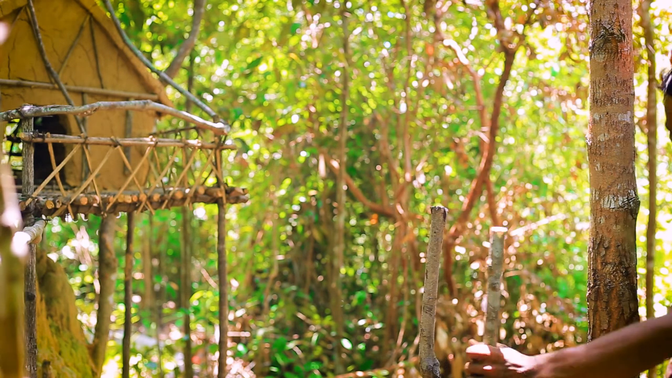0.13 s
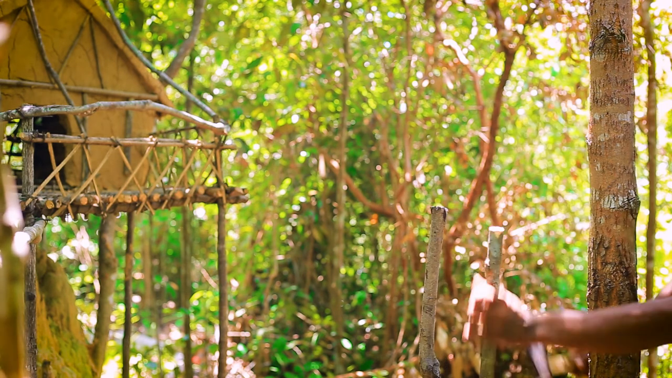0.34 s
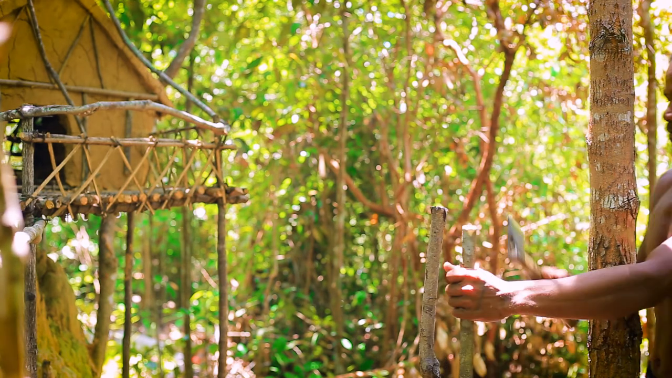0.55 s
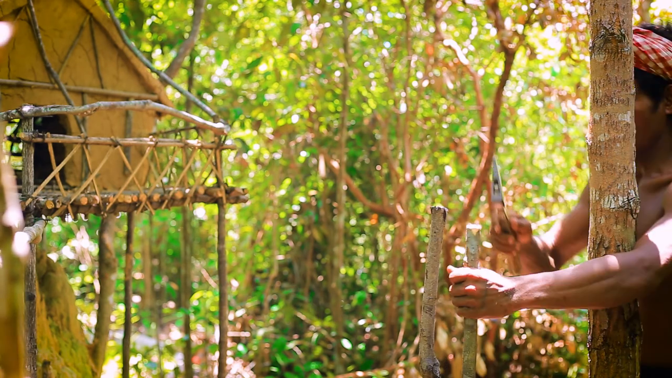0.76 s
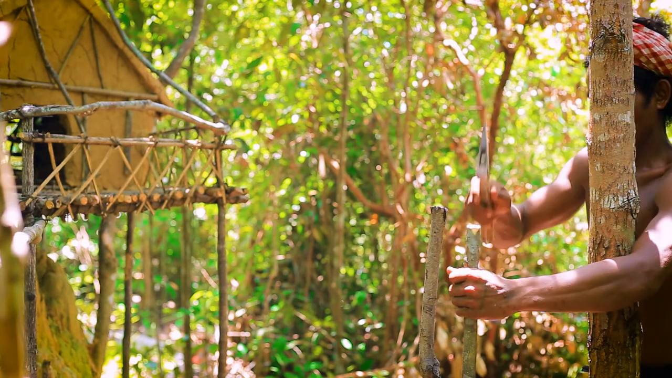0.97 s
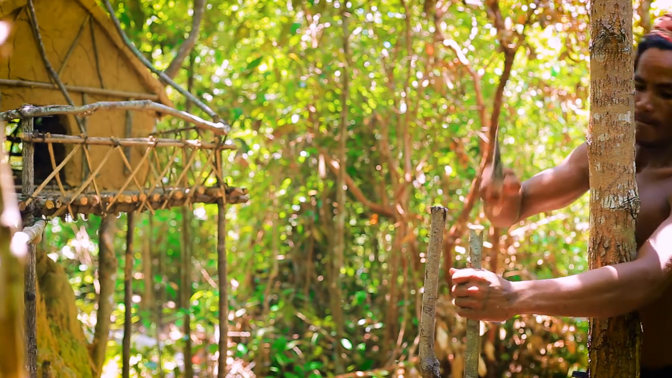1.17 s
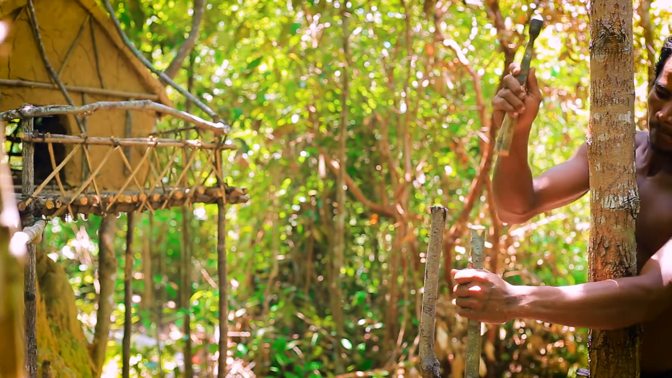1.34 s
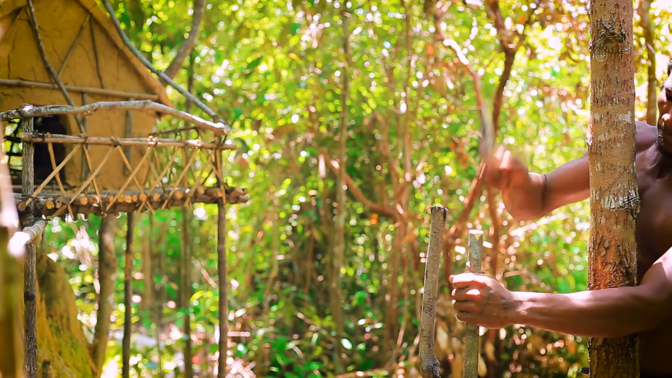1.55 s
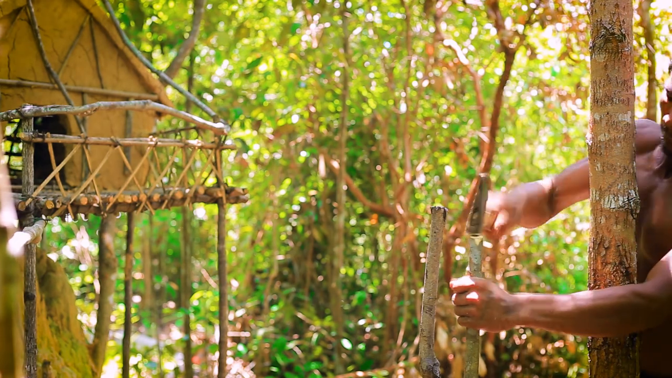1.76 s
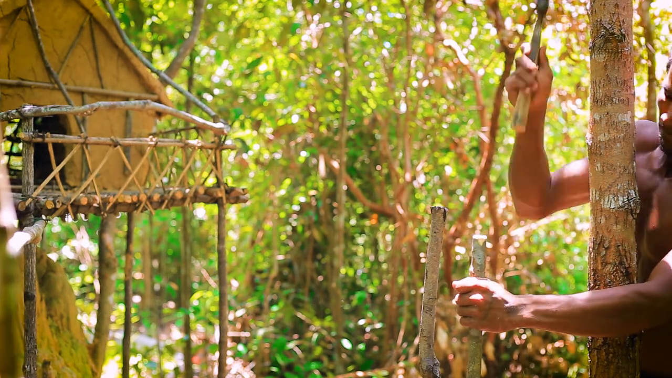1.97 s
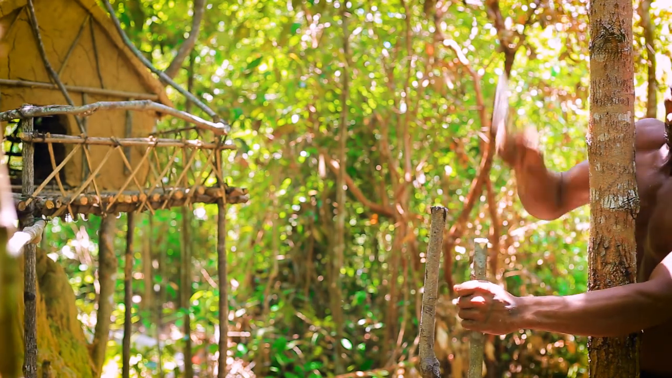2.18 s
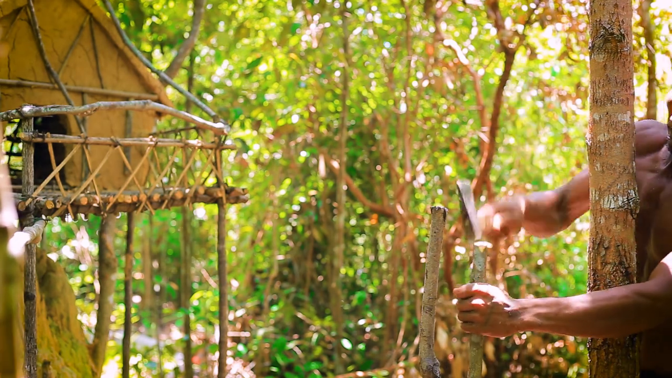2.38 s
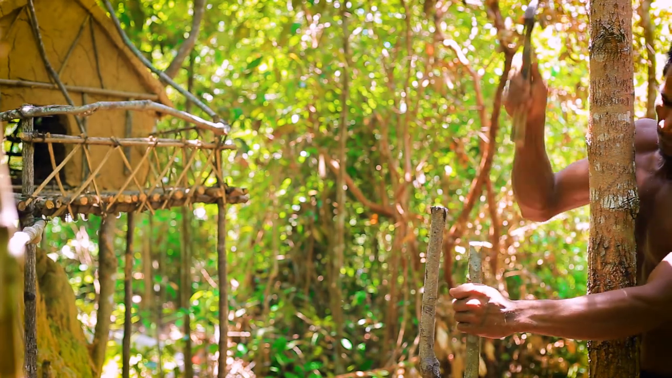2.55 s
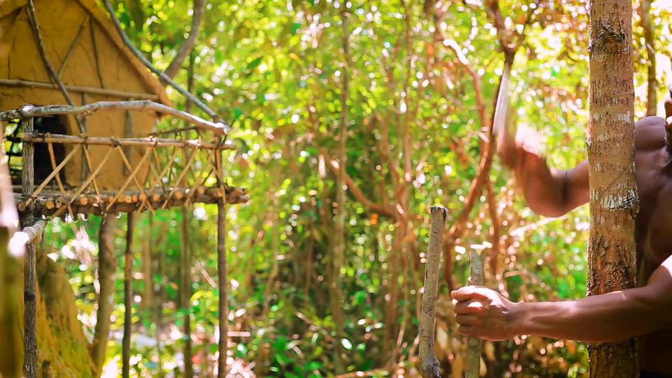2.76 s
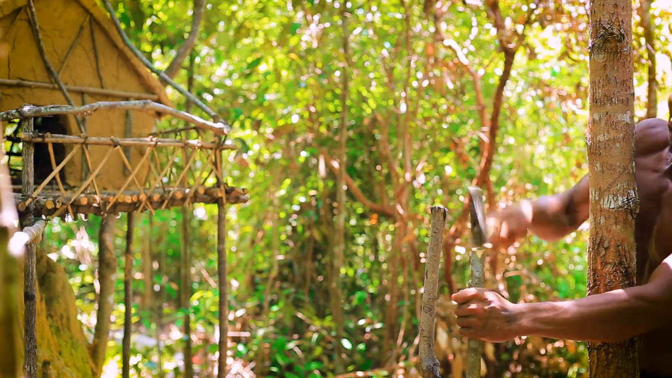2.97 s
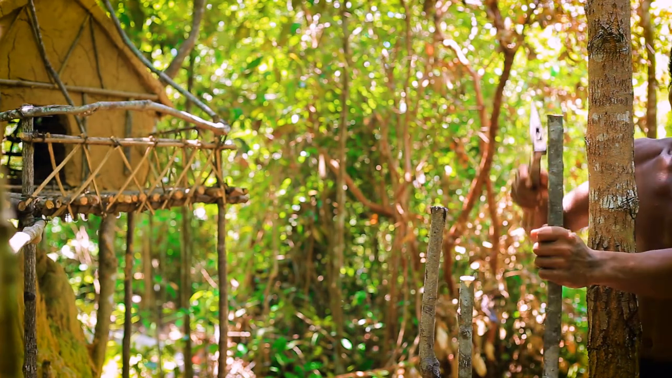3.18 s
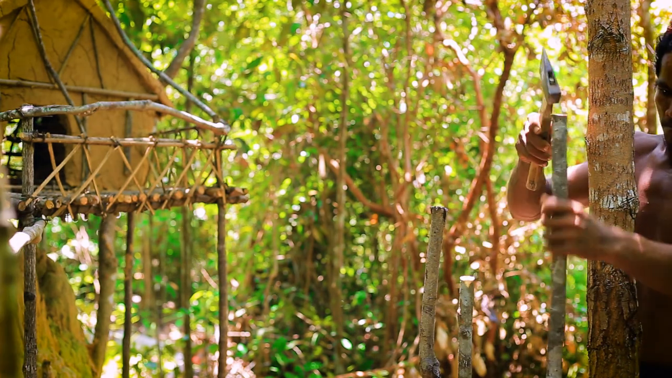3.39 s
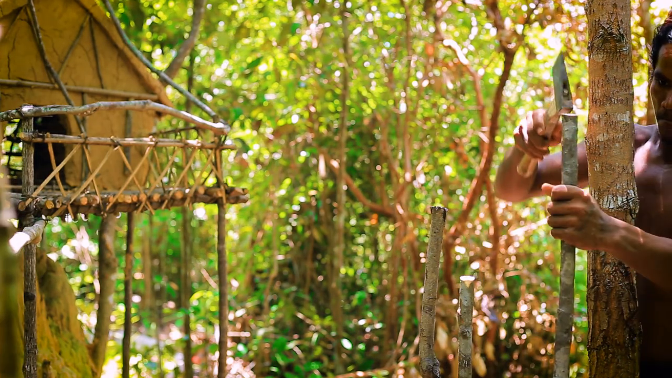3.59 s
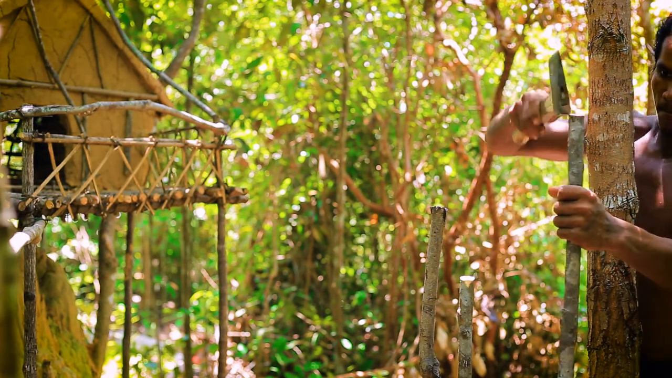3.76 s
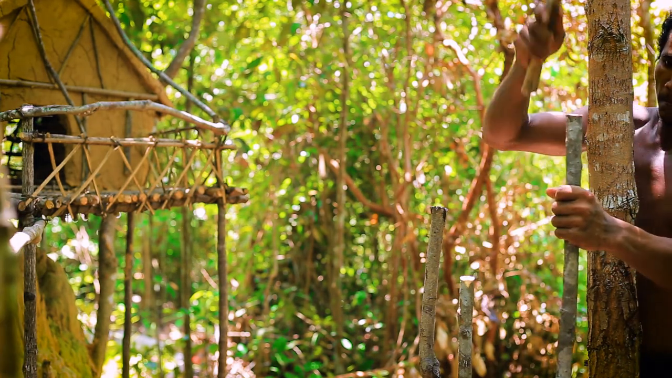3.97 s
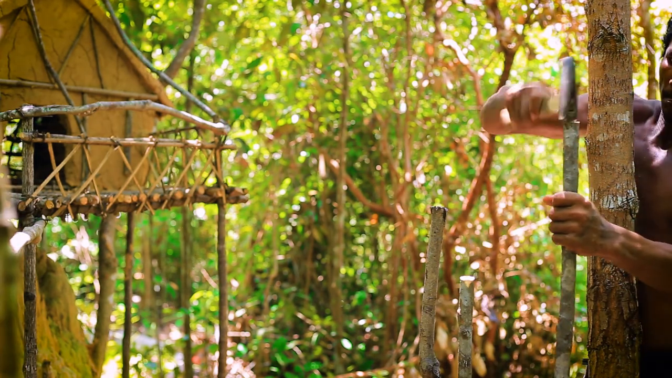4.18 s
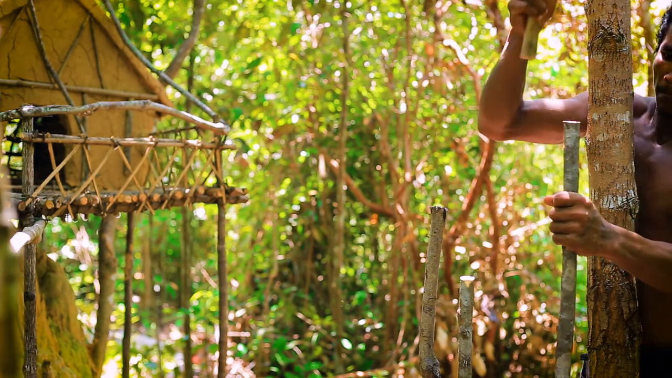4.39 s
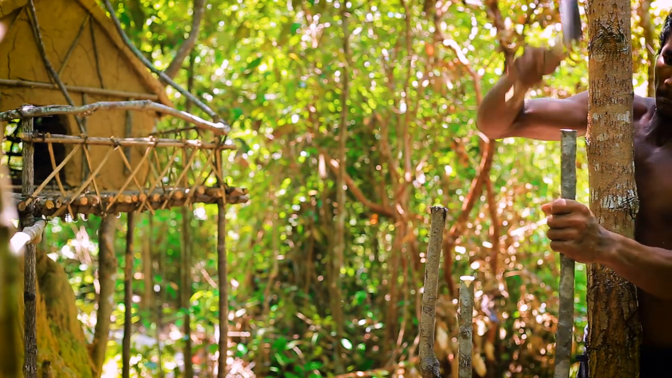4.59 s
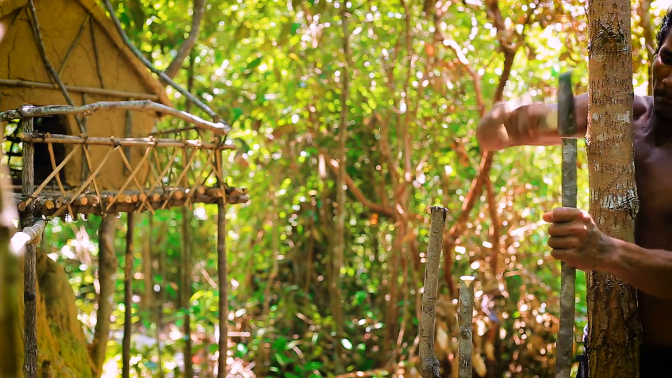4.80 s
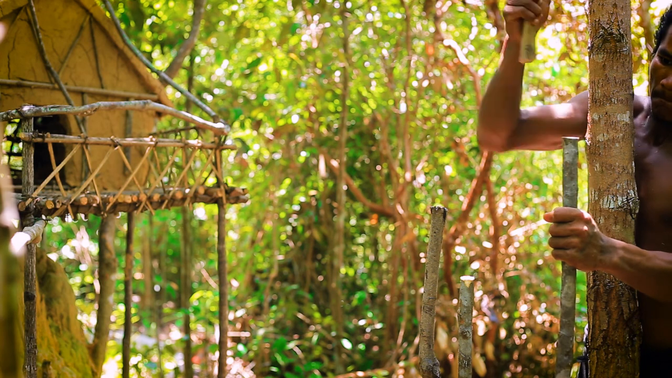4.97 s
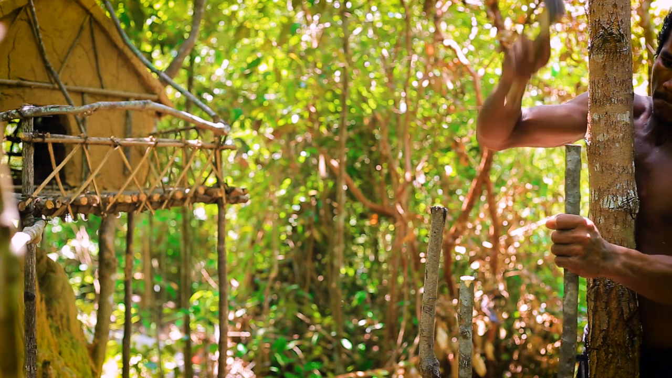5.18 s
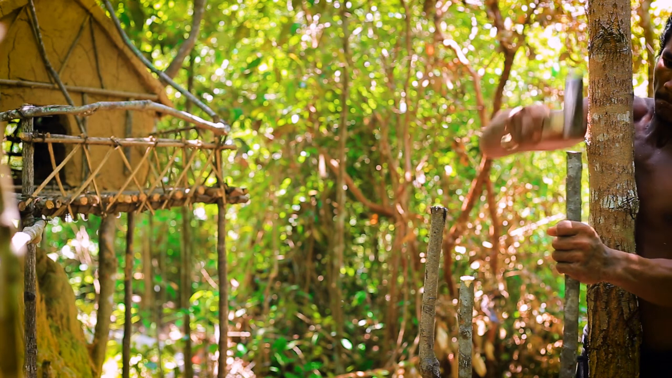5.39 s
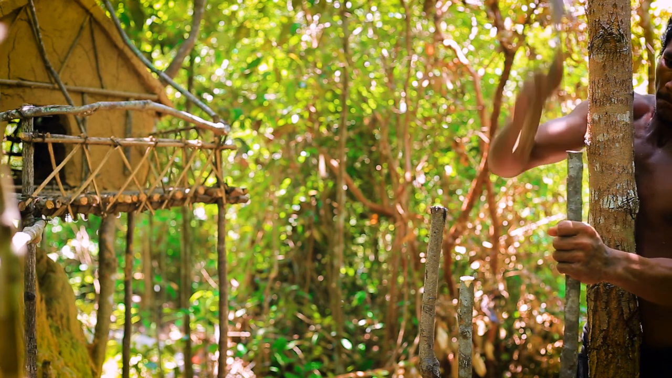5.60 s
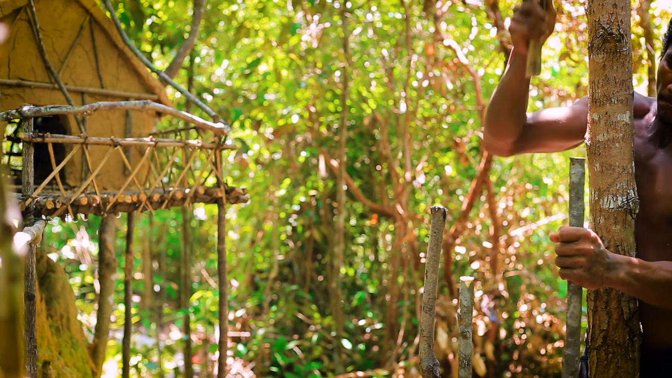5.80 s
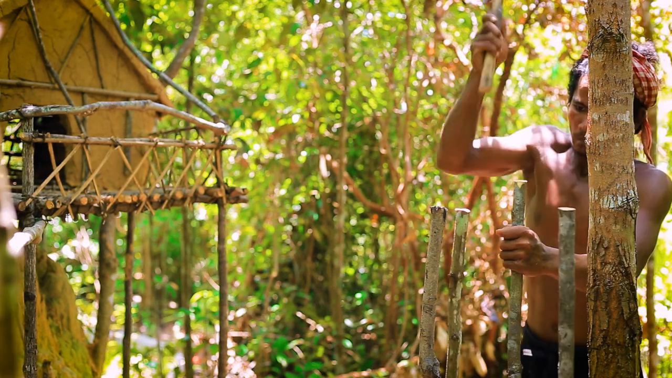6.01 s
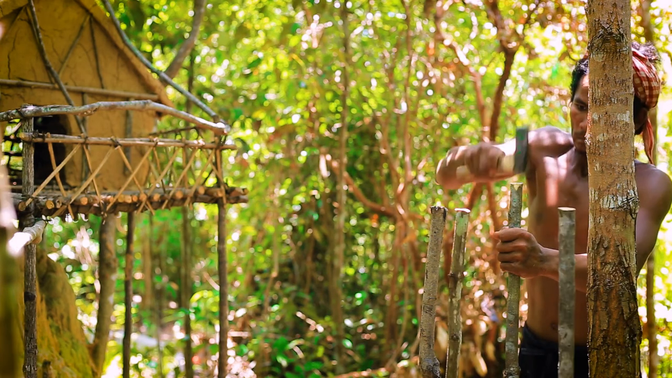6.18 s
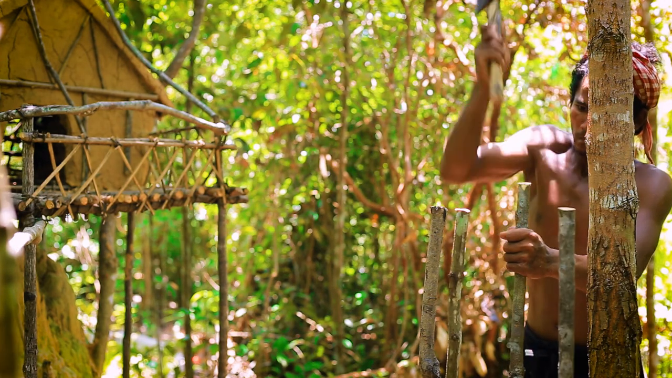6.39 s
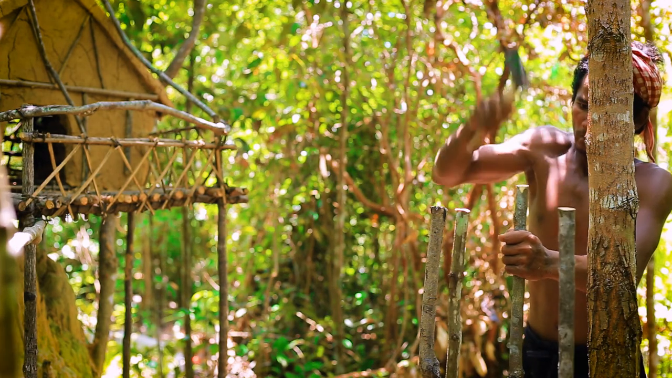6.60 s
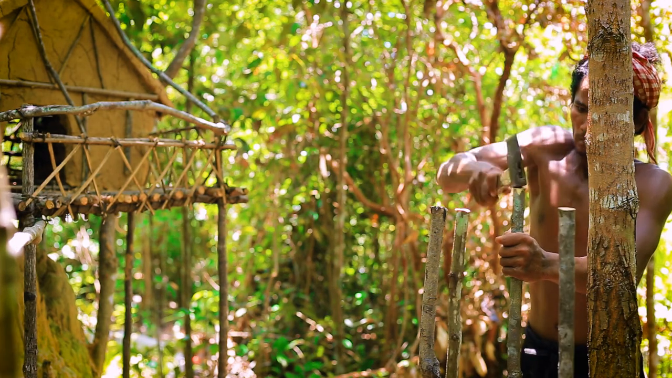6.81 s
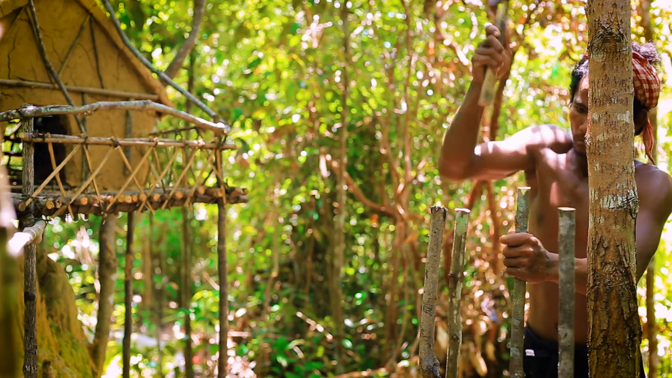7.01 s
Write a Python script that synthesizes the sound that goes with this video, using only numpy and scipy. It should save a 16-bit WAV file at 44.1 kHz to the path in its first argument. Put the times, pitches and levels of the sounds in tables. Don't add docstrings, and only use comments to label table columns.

```python
import sys
import numpy as np
from scipy import signal
from scipy.io import wavfile
from scipy.ndimage import uniform_filter1d

SR = 44100
rng = np.random.default_rng(int(sys.argv[2]) if len(sys.argv) > 2 else 0)


def store_wav(level_fs):
    pcm = np.round(np.clip(np.atleast_2d(level_fs), -1, 1) * 32767)
    wavfile.write(sys.argv[1], SR, pcm.T.astype(np.int16))


def volts_from_decibels(level):
    exponent = np.asarray(level, float) / 20
    return 10 ** exponent


N = 310905
SCENE_CHANGE_S = 5.9715
OVERDRIVE_DB, CLIP_LEVEL = 14, 0.218


def rms_one(x):
    return x / np.sqrt(np.mean(np.abs(x) ** 2) + 1e-20)


def at_hz(points, hz):
    table_hz, values = np.transpose(points)
    return np.interp(np.log(hz), np.log(table_hz), values)


def add(out, s, sound):
    start = max(round(s * SR), 0)
    out[start:start + len(sound)] += sound[:N - start]


def band(x, low_hz, high_hz):
    return signal.sosfilt(signal.butter(2, [low_hz, high_hz], "band", fs=SR, output="sos"), x)


def high_pass(x, low_hz):
    return signal.sosfilt(signal.butter(2, low_hz, "high", fs=SR, output="sos"), x)


def flutter(size, spread_hz):
    r = np.exp(-np.pi * spread_hz / SR)
    noise = rng.standard_normal((2, size + 2000))
    slow = signal.lfilter([1], [1, -2 * r, r * r], noise)[:, 2000:]
    return rms_one(slow[0] + 1j * slow[1])


def tone(pitch_hz):
    return np.exp(2j * np.pi * np.cumsum(pitch_hz) / SR)


def ringing(modes, t):
    out = 0
    luck_db = rng.standard_normal(len(modes))
    for (hz, db, t60), extra_db in zip(modes, luck_db):
        grain = 0.42 + 0.95 * flutter(len(t), spread_hz=200)
        fade = volts_from_decibels(-60 * t / t60) + volts_from_decibels(-25 - 60 * t / (3.0 * t60))
        out = out + volts_from_decibels(db + extra_db) * fade * (grain * tone(np.full(len(t), hz))).imag
    return out


# [f/Hz, level/dB, t60/s]
THUD_MODES = [(139.7, -14.5, 0.055), (233.5, -2.5, 0.045), (316.5, -4, 0.022), (607, -9, 0.034),
              (1160, -4, 0.021)]


def thud(t, linger, pitch):
    late = np.maximum(t - 0.0035, 0)
    jolt = 0
    for k, (hz, db, t60) in enumerate(THUD_MODES):
        fade = volts_from_decibels(db - 60 * late / (t60 * linger))
        jolt = jolt + (-1) ** k * fade * np.sin(2 * np.pi * hz * pitch * late)
    return high_pass(jolt, 130)


# [f/Hz, level per Hz/dB]
CRACK_COLOUR = [(150, -1.5), (500, -6.5), (1000, -4.5), (3300, 4), (5000, -5.5), (7000, -13), (11000, -23),
                (16000, -19.5)]
# [f/Hz, t60/s]
SCATTER = [(150, 0.12), (700, 0.065), (1840, 0.055), (4850, 0.12), (12800, 0.1)]


def blows(table, ring, wood):
    out = np.zeros(N)
    t = np.arange(SR // 3) / SR
    edges = 156 * 2 ** np.arange(0, 7.1, 0.5)
    trunks = np.arange(0, 0.35, 0.007)
    linger, first_tilt_db, tilt_step_db, pitch = wood
    for count, (s, strength_db, thud_db, ring_db) in enumerate(table):
        tilt_db = first_tilt_db + count * tilt_step_db
        white = rng.standard_normal((2, len(t)))
        crack = 0
        for k, (low, high) in enumerate(zip(edges, edges[1:])):
            hz = np.sqrt(low * high)
            t60 = at_hz(SCATTER, hz) * linger
            fade = volts_from_decibels(-60 * t / t60) + volts_from_decibels(-23.5 - 60 * t / (3.08 * t60))
            trunk_db = 2.5 * np.interp(t, trunks, rng.standard_normal(len(trunks)))
            fade = fade * volts_from_decibels(trunk_db)
            colour_db = at_hz(CRACK_COLOUR, hz) + tilt_db * np.log2(hz / 2500)
            crack = crack + volts_from_decibels(colour_db - 5.0) * band(white[k % 2] * fade, low, high)
        rings = volts_from_decibels(ring_db - 15.0) * ringing(ring, t)
        jolt = volts_from_decibels(thud_db - 5.0) * thud(t, linger, pitch)
        blow = volts_from_decibels(strength_db + OVERDRIVE_DB) * (crack + rings + jolt)
        if s < SCENE_CHANGE_S:
            blow = blow[:round((SCENE_CHANGE_S - s) * SR)]
        add(out, s, blow)
    return out


# [t/s, strength level/dB, thud level/dB, ring level/dB]
SHORT_STAKE_BLOWS = [(1.513, -12, -5.5, -3.5), (1.828, -7.5, -17.5, -3.5), (2.133, -10, -4, -5),
                     (2.423, -11, -2, -5), (2.705, -10, -1.5, -4.5), (2.991, -9, -4, -5)]
TALL_STAKE_BLOWS = [(4.191, -11.5, -36, 1.5), (4.523, -8.5, -35, 5), (4.82, -8.5, -17, 4),
                    (5.107, -9.5, -18, 4.5), (5.395, -8.5, -18, 4.5), (5.683, -8, -32, 3.3),
                    (5.957, -11, -37, 2.2)]
THIRD_STAKE_BLOWS = [
    (6.184, -14.5, 2.5, 1),
    (6.512, -8.5, -8, -2),
    (6.844, -8.5, -6, -3),
]
# [f/Hz, level/dB, t60/s]
SHORT_RING = [(1625, -3, 0.06), (2570, 5, 0.065), (3170, 6, 0.06), (4000, 0, 0.06), (4770, 4, .085),
              (6560, -8, 0.08)]
TALL_RING = [(1645, 5, 0.071), (2551, -0.5, 0.044), (3306, -6.5, 0.13), (3448, -2.5, 0.12),
             (4303, -14.5, 0.012), (5045, -4.5, 0.098)]
THIRD_RING = [(1476, -3.5, 0.072), (1816, 2, 0.073), (2465, 6, 0.037), (3234, 0.5, 0.053),
              (3636, -4, 0.076), (4670, -19, 0.12), (6630, -6.5, 0.057)]
# scatter t60 factor, tilt in dB per octave, its change per blow, thud pitch factor
SHORT_WOOD, TALL_WOOD = (1.092, 1.04, -0.33, 0.996), (1, 1, -0.22, 0.97)
THIRD_WOOD = (0.93, 0.04, 0.01, 1.1)


def axe():
    short = blows(SHORT_STAKE_BLOWS, SHORT_RING, SHORT_WOOD)
    tall = blows(TALL_STAKE_BLOWS, TALL_RING, TALL_WOOD)
    third = blows(THIRD_STAKE_BLOWS, THIRD_RING, THIRD_WOOD)
    return short + tall + third


# [t/s, strength level/dB, thud level/dB, ring level/dB]
KNOCKS = [
    (1.078, -23, 7, -28),
    (3.762, -51, -4, -15),
]


def knocks():
    return blows(KNOCKS, SHORT_RING, wood=(0.42, -2.0, -2.0, 0.8))


# [t/s, f/Hz, level/dB, t60/s]
THUMPS = [
    (0.136, 207, -28, 0.06),
    (5.807, 104, -34, 0.063),
    (6.018, 139, -37, 0.048),
]


def thumps():
    out = np.zeros(N)
    t = np.arange(SR // 8) / SR
    for s, hz, level_db, t60 in THUMPS:
        swell = 1 - np.exp(-t / 0.0015)
        add(out, s, volts_from_decibels(level_db - 60 * t / t60) * swell * np.sin(2 * np.pi * hz * t))
    return out


# [t/s, length/s, level/dB]
RUSTLES = [(0.092, 0.068, -49), (0.84, 0.048, -54), (0.89, 0.065, -56), (3.186, 0.06, -59),
           (3.767, 0.043, -59), (4.351, 0.0055, -52), (4.795, 0.007, -69)]


def rustles():
    out = np.zeros(N)
    for s, length, level_db in RUSTLES:
        x = np.linspace(0, 1, round(length * SR))
        swish = band(rng.standard_normal(len(x)), 2500, 17000)
        add(out, s, volts_from_decibels(level_db) * np.sin(np.pi * x ** 0.92) * swish)
    return out


# [t/s, length/s, top f/Hz, level/dB]
SLIDES = [(.64, .29, 1730, -45)]
SCOOPS = [(2.538, .105, 2000, -37)]
DROOPS = [(1.225, .27, 1545, -39), (3.465, .275, 1575, -38)]
FALLS = [(2.205, .065, 1364, -39), (2.305, .055, 1300, -45), (4.6, .06, 1394, -38),
         (4.706, 0.041, 1354, -46)]
CLIMBS = [(1.69, .43, 1990, -37.5), (4.0, .52, 1975, -38)]
HOLDS = [(2.19, .09, 1864, -42), (2.285, 0.079, 1824, -36.5), (4.575, 0.1, 1900, -41.5),
         (4.675, 0.11, 1845, -37)]
# [share of the note, pitch ratio to its top, level/dB]
SLIDE_SHAPE = [(0, .9, -16), (.22, 1.0, -13), (.48, .9, 0), (.8, .77, -3), (1.0, .76, -12)]
SCOOP_SHAPE = [(0, .76, -3), (.3, .69, 0), (.6, .77, -2), (1.0, 1.0, -8)]
DROOP_SHAPE = [(0, .94, -24), (.16, .99, -12), (.41, 1.0, -2), (.56, .93, 0), (.67, .875, -5),
               (.84, .83, -7), (1.0, .75, -20)]
FALL_SHAPE = [(0, .99, -16), (.15, 0.96, -3), (.5, .83, -6.5), (1.0, 0.72, -14)]
CLIMB_SHAPE = [(0, .73, -12), (.16, .875, -9), (.33, .91, -5), (.46, .975, 0), (.6, .99, -2),
               (.8, 1.0, -11), (1.0, 1.0, -22)]
HOLD_SHAPE = [(0, 1.0, -12), (.2, 1.0, 0), (.55, 1.0, -7), (1.0, .99, -22)]
# share of the tone, speed in Hz
STEADY, THROB, HOARSE = (0.25, 50), (0.8, 75), (0.7, 200)


def whistler():
    out = np.zeros(N)
    kinds = [(SLIDES, SLIDE_SHAPE, STEADY), (SCOOPS, SCOOP_SHAPE, HOARSE),
             (DROOPS, DROOP_SHAPE, STEADY), (FALLS, FALL_SHAPE, STEADY),
             (CLIMBS, CLIMB_SHAPE, THROB), (HOLDS, HOLD_SHAPE, THROB)]
    for notes, shape, (depth, waver_hz) in kinds:
        share, ratio, shape_db = np.transpose(shape)
        for s, length, top_hz, level_db in notes:
            x = np.linspace(0, 1, round(length * SR))
            edge = np.clip(np.minimum(x, 1 - x) * length / 0.008, 0, 1)
            waver = np.sqrt(1 - depth ** 2) + depth * flutter(SR, waver_hz)[:len(x)]
            gain = edge * volts_from_decibels(level_db + np.interp(x, share, shape_db))
            whistle = tone(top_hz * np.interp(x, share, ratio))
            add(out, s, np.sqrt(2) * gain * (waver * whistle).real)
    return out


# [t/s, top f/Hz, rest f/Hz, level/dB]
CHIPS = [
    (3.266, 5800, 3255, -29.5),
    (4.329, 5800, 3276, -31.5),
]
CHIP_PERCH_S, CHIP_DIVE_S, CHIP_S, CHIP_END_HZ = 0.008, 0.003, 0.042, 450


def chips():
    out = np.zeros(N)
    t = np.arange(round(CHIP_S * SR)) / SR
    for s, top_hz, rest_hz, level_db in CHIPS:
        swell = np.interp(t, [0, 0.002, CHIP_PERCH_S, 0.015, 0.034, CHIP_S], [0, 0.09, 0.09, 0.85, 1, 0])
        rasp = 1 + 0.35 * flutter(len(t), spread_hz=350)
        dive = np.exp(-np.maximum(t - CHIP_PERCH_S, 0) / CHIP_DIVE_S - t / 0.045)
        droop_hz = CHIP_END_HZ * (t / CHIP_S) ** 8
        pitch_hz = rest_hz + (top_hz - rest_hz) * dive - droop_hz
        add(out, s, volts_from_decibels(level_db) * swell * (rasp * tone(pitch_hz)).real)
    return out


# [t/s, length/s, start f/Hz, end f/Hz, level/dB, notes per s]
TRILL = (3.484, .37, 4250, 4050, -49, 17.6)


def trill():
    out = np.zeros(N)
    s, length, start_hz, end_hz, level_db, rate = TRILL
    t = np.arange(round(length * SR)) / SR
    since = t * rate % 1 / rate
    dive = 1 + 0.13 * np.exp(-since / 0.026)
    pluck = since / 0.0037 * np.exp(-since / 0.0055)
    pitch_hz = (start_hz + (end_hz - start_hz) * t / length) * dive
    add(out, s, 3 * volts_from_decibels(level_db - 9 * t / length) * (pluck * tone(pitch_hz)).real)
    return out


# [t/s, length/s, start f/Hz, end f/Hz, level/dB]
SEEPS = [(0.042, 0.037, 4500, 4400, -44), (0.868, 0.13, 3030, 3000, -50.5), (1.179, .05, 3800, 3760, -53),
         (1.23, .05, 4330, 4250, -56), (1.39, 0.14, 4530, 4370, -47), (1.987, 0.083, 4000, 4050, -53),
         (2.258, .095, 4330, 4450, -50), (2.495, .081, 2585, 2560, -46), (2.491, 0.0516, 2270, 2060, -30),
         (2.922, 0.088, 4500, 4550, -51), (3.48, .18, 3600, 3490, -52.5), (6.09, .06, 1560, 1510, -58),
         (5.3, 0.093, 3320, 2980, -47.5), (5.305, .11, 3480, 3320, -49), (6.898, 0.12, 1397, 1354, -57.5)]
CLEAR = [(.55, .11, 3980, 4160, -48), (.73, .1, 5860, 5760, -60), (1.235, .07, 5500, 5460, -59),
         (1.035, .1, 4340, 4290, -45), (4.946, .099, 3120, 3100, -43.5), (5.197, .11, 3330, 3430, -42),
         (6.883, .17, 3140, 3060, -44)]
# [t/s, length/s, start f/Hz, level/dB]
CHIRPS = [(.0, .051, 3300, -48), (.061, 0.096, 3650, -48), (0.098, 0.044, 2760, -50),
          (0.149, .07, 5140, -54), (.309, 0.1, 3420, -46), (.45, 0.059, 4430, -55), (.473, .1, 3810, -46.5),
          (.702, 0.12, 4390, -48.5), (0.814, 0.1, 3700, -45), (1.278, .07, 2690, -49),
          (1.228, .06, 3850, -49), (1.47, .037, 3620, -49), (1.658, 0.11, 3690, -47),
          (1.754, 0.072, 3330, -46.5), (1.933, 0.053, 3730, -45.5), (2.535, 0.073, 2210, -45),
          (2.64, .06, 1750, -51), (3.31, 0.098, 3540, -55), (2.807, .12, 4760, -51),
          (3.164, 0.067, 1614, -47), (3.488, 0.28, 4570, -54.5), (3.503, 0.32, 4240, -56),
          (3.509, 0.31, 3910, -56), (4.967, 0.077, 2170, -45), (4.979, 0.055, 1740, -45),
          (5.272, 0.045, 1756, -45), (6.963, 0.11, 4600, -51.5)]
# [t/s, start f/Hz, level/dB]
CHUCKS = [(.567, 2056, -46.5), (.86, 2090, -44.5), (2.92, 3640, -52), (4.677, 2640, -50),
          (5.247, 2680, -46), (5.65, 2650, -44.5)]
SEEP_SPREAD_HZ, CLEAR_SPREAD_HZ, CHIRP_SPREAD_HZ, CHUCK_SPREAD_HZ = 75, 18, 300, 320
CHIRP_SAG, CHUCK_S, CHUCK_DROP = 0.97, 0.05, 0.84
# first (s, Hz, dB), step (s, Hz, dB), length s, end pitch ratio
PIP_FIRST, PIP_STEP, PIP_S, PIP_DROP = (6.733, 2500, -53), (0.0223, 170, 0.8), 0.014, 0.92


def far_calls():
    calls = [row + (SEEP_SPREAD_HZ,) for row in SEEPS]
    calls += [row + (CLEAR_SPREAD_HZ,) for row in CLEAR]
    calls += [(s, length, hz, hz * CHIRP_SAG, db, CHIRP_SPREAD_HZ) for s, length, hz, db in CHIRPS]
    calls += [(s, CHUCK_S, hz, hz * CHUCK_DROP, db, CHUCK_SPREAD_HZ) for s, hz, db in CHUCKS]
    pips = np.add(PIP_FIRST, np.outer(np.arange(5), PIP_STEP))
    calls += [(s, PIP_S, hz, hz * PIP_DROP, db, SEEP_SPREAD_HZ) for s, hz, db in pips]
    out = np.zeros(N)
    for s, length, start_hz, end_hz, level_db, spread_hz in calls:
        x = np.linspace(0, 1, round(length * SR))
        blur = 0.098 + flutter(SR // 2, spread_hz)[:len(x)]
        call = (blur * tone(start_hz + (end_hz - start_hz) * x)).real
        add(out, s, volts_from_decibels(level_db) * np.sin(np.pi * x) ** 0.28 * call)
    return out


def woods(x):
    t = np.arange(SR // 2) / SR
    tail = rng.standard_normal(len(t)) * volts_from_decibels(-60 * t / 0.72) * (1 - np.exp(-t / 0.0065))
    return signal.fftconvolve(x, tail / np.sqrt(np.sum(tail ** 2)))[:N]


# [from t/s, to t/s, level/dB]
INSECT_SPELLS = [
    (1.5, 3.55, -78),
    (5.975, 7.05, -71),
]
INSECT_HZ, INSECT_FAR_DB = 6950, -85


def insect():
    t = np.arange(N) / SR
    level = np.full(N, volts_from_decibels(INSECT_FAR_DB))
    for start, end, level_db in INSECT_SPELLS:
        level[(t > start) & (t < end)] = volts_from_decibels(level_db)
    buzz = flutter(N, spread_hz=450) * tone(np.full(N, INSECT_HZ))
    octave = volts_from_decibels(-17) * buzz ** 2
    return uniform_filter1d(level, size=2000) * (buzz + octave).real


# [t/s, level/dB]
BREEZE = [(0.0, -66.5), (0.11, -65.5), (0.23, -65), (1.44, -65), (3.13, -67), (3.28, -69.5), (4.06, -71.5),
          (5.14, -68.5), (5.29, -66), (5.83, -63.5), (5.95, -64)]
BREEZE_AFTER = [(5.974, -75.5), (6.419, -74.5), (7.05, -74)]
# [f/Hz, level per Hz/dB]
AIR_COLOUR = [(15, -40), (33, -4.5), (99, 1.5), (423, -7.5), (3640, -11.5), (6770, -22.5), (7750, -36.5),
              (15600, -38.5)]
AIR_DB, AIR_FOLLOWS, AFTER_CHANGE_DB = (-54, -52, -65.5), (0.36, 0.84, 1), (2.2, -0.3, 3.5)
MIDDLING_DB = -67.5


def forest_air():
    s, breeze_db = np.transpose(BREEZE + BREEZE_AFTER)
    t = np.arange(N) / SR
    edges = 19 * 2 ** np.arange(0, 10.1, 0.5)
    white = rng.standard_normal((2, N))
    layers = np.zeros((3, N))
    knots = np.arange(0, 7.2, 0.06)
    for k, (low, high) in enumerate(zip(edges, edges[1:])):
        hz = np.sqrt(low * high)
        patch_db = 1.3 * np.interp(t, knots, rng.standard_normal(len(knots)))
        which = int(hz > 700) + int(hz > 7000)
        layers[which] += volts_from_decibels(at_hz(AIR_COLOUR, hz) + patch_db) * band(white[k % 2], low, high)
    out = np.zeros(N)
    for layer, db, share, moved_db in zip(layers, AIR_DB, AIR_FOLLOWS, AFTER_CHANGE_DB):
        level_db = db + share * (breeze_db - MIDDLING_DB) + moved_db * (s > SCENE_CHANGE_S)
        out += volts_from_decibels(np.interp(t, s, level_db)) * rms_one(layer)
    return out


def scene():
    handling = knocks() + thumps() + rustles()
    calls = whistler() + far_calls() + chips() + trill()
    birds = calls + woods(volts_from_decibels(-8.5) * calls)
    return (axe() + handling + birds + insect() + forest_air())[None]


def roll_off(x):
    return signal.sosfilt(signal.butter(12, 17090, fs=SR, output="sos"), x)


def record(dry):
    clipped = np.clip(dry, -CLIP_LEVEL, CLIP_LEVEL)
    top_cut = signal.cheby2(14, 30, 15900, fs=SR, output="sos")
    mix = signal.sosfilt(top_cut, clipped)
    return roll_off(mix)


dry = scene()
out = record(dry)
store_wav(out)
```